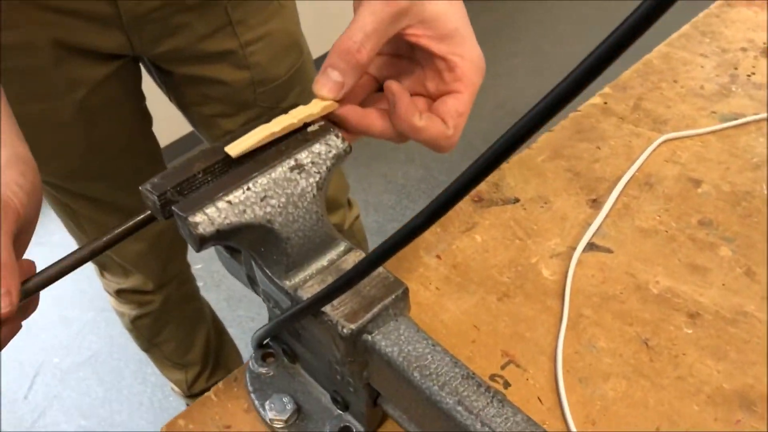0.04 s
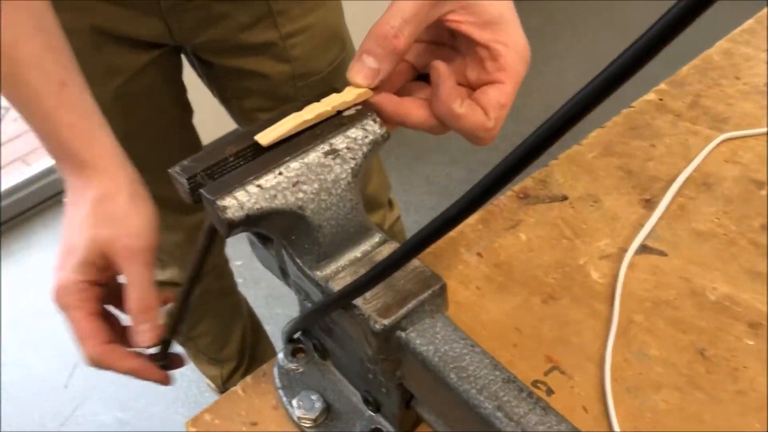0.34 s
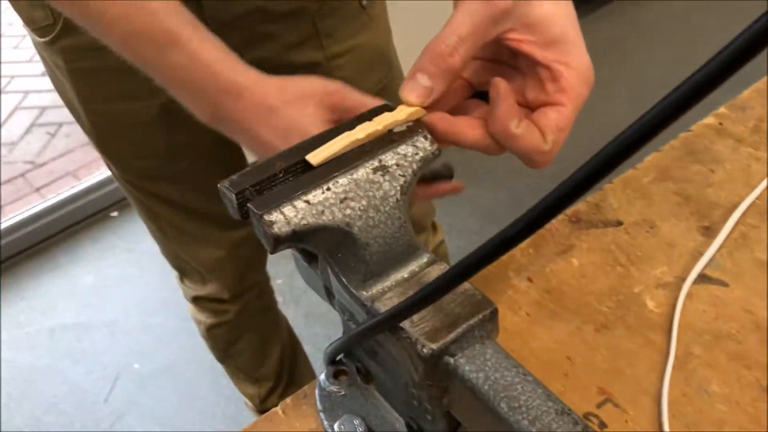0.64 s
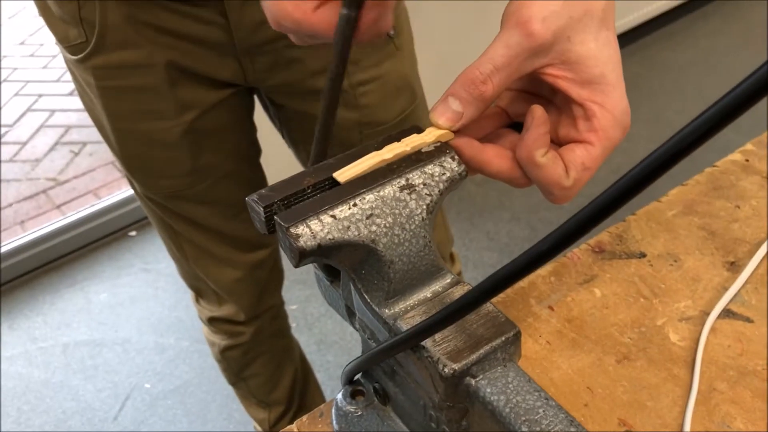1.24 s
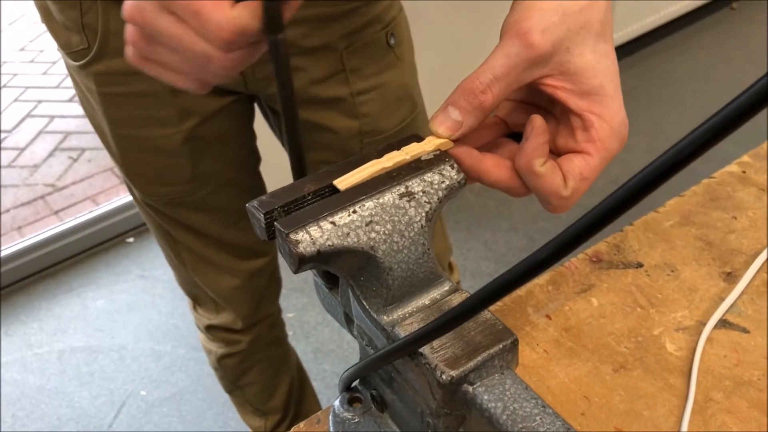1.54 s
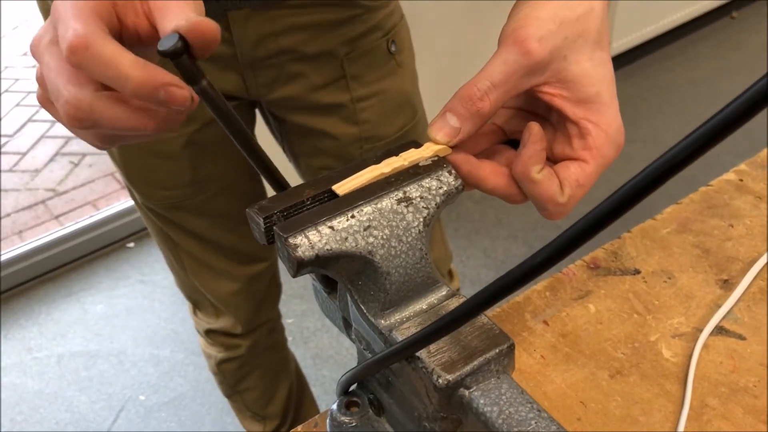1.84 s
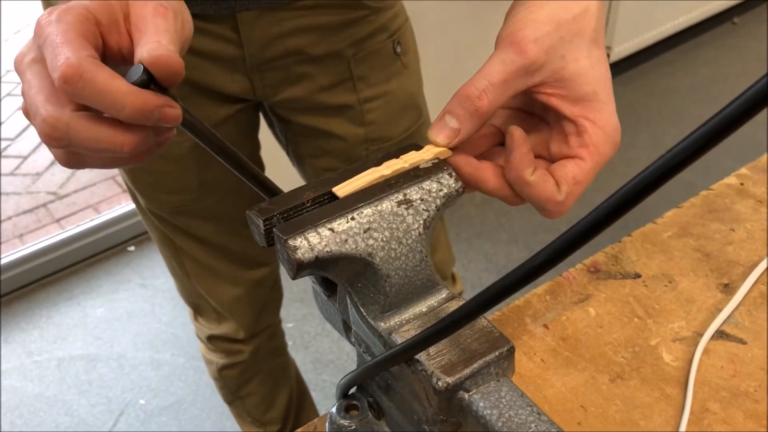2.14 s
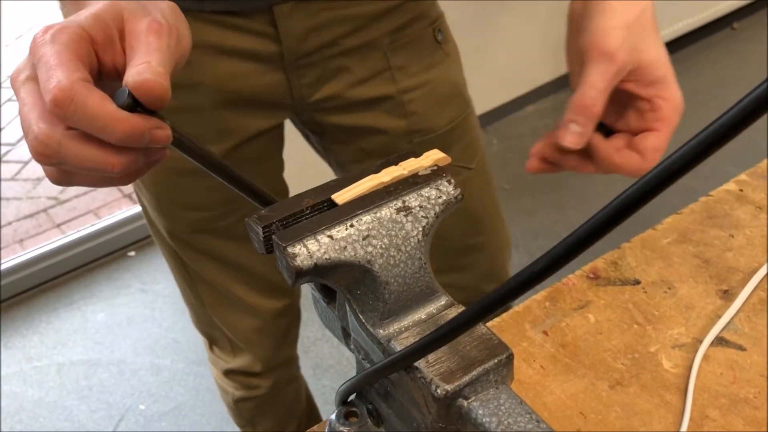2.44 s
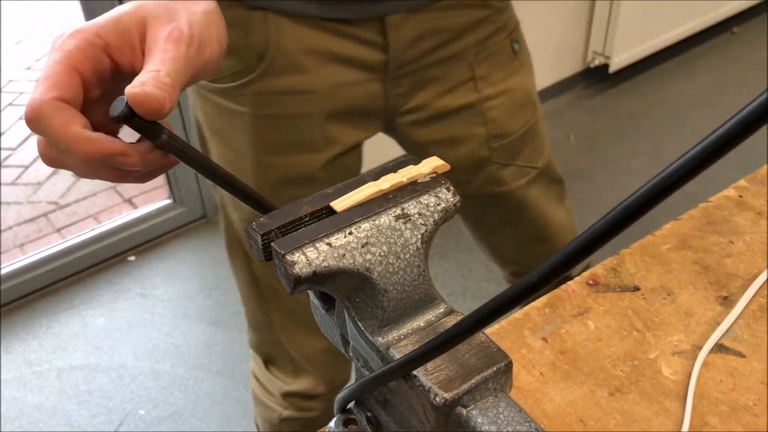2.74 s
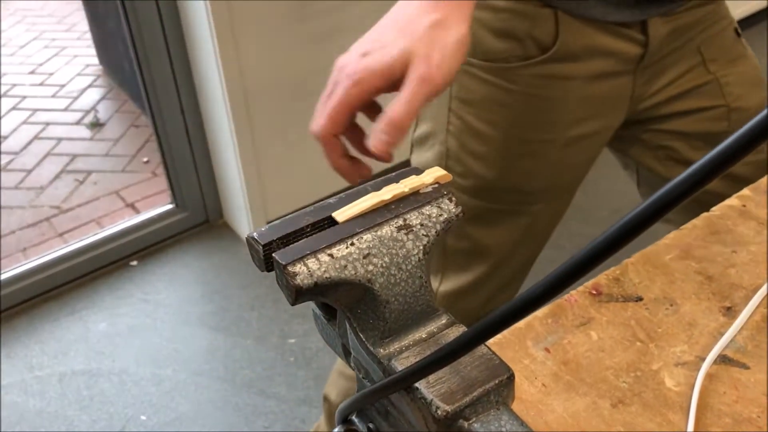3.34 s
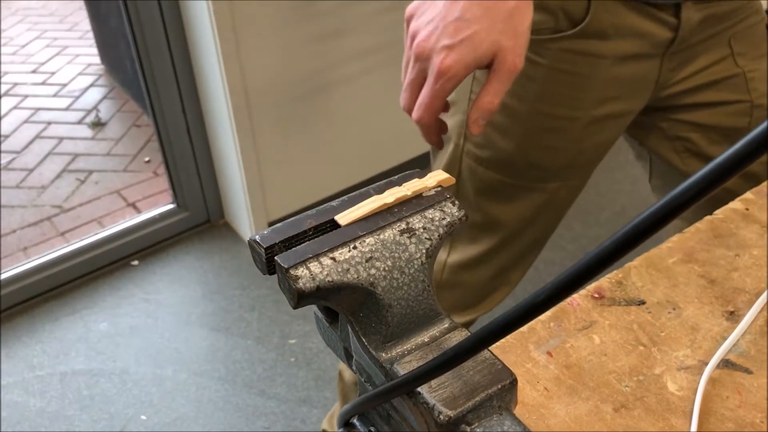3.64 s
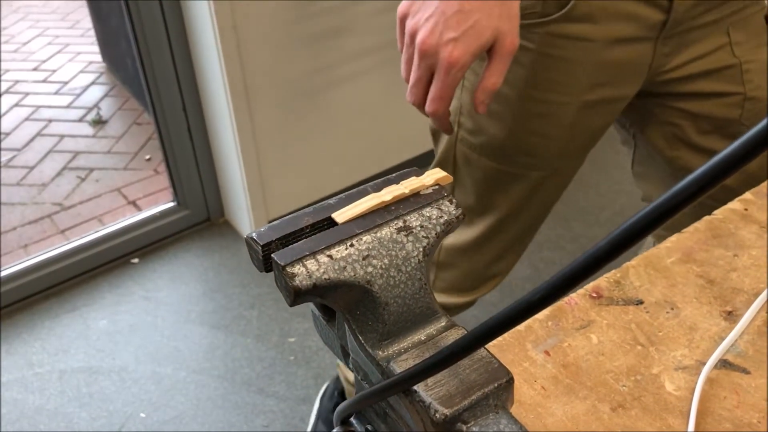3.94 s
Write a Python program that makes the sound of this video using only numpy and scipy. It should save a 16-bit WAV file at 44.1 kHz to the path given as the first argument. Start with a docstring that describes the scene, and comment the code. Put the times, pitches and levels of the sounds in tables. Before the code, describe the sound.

A steel vise handle slides rattling through its hole and stops with a sharp clank.

```python
"""The loose handle of a steel bench vise slides rattling through the screw head until its end knob
clanks against it. Each hit rings the rod and the vise, and the wooden bench thuds.
Before that the vise is tightened: a hand knocks the handle, shoes and sleeves scuff,
and there are faint gurgles and rubs. The workshop echoes over a low, steady hush."""
import sys
import numpy as np
from scipy import signal
from scipy.fft import rfft, irfft
from scipy.io import wavfile

SR = 44100
rng = np.random.default_rng(int(sys.argv[2]) if len(sys.argv) > 2 else 0)


def file_out(sig):
    """Save sig as 16-bit WAV at sys.argv[1]."""
    # one column per channel
    cols = np.atleast_2d(sig).T
    # limit, then scale
    lim = np.clip(cols, -1, 1)
    pcm = np.round(lim * 32767).astype(np.int16)
    wavfile.write(sys.argv[1], SR, pcm)


N = 176400
T, HZ = np.arange(N) / SR, np.fft.rfftfreq(N, 1 / SR)

# Levels in the tables are relative. A spectrum says how strong each pitch is.
# room noise: f/Hz, level/dB
HUSH_SPECTRUM = [(15, -43.5), (25, -16), (48, -3.5), (75, -5.5), (107, -1.5), (183, -5), (253, -13),
                 (289, -12), (368, -13), (399, -17.5), (648, -21.5), (722, -25.5), (848, -29.5), (970, -25),
                 (1110, -28), (1660, -28.5), (2170, -33), (3090, -31), (3340, -31.5), (3720, -29),
                 (5730, -40), (10400, -44), (15500, -52.5)]
# how long the echo takes to fade by 60 dB (its t60): f/Hz, t60/s
ECHO_FADES = [(100, 0.75), (500, 0.86), (1300, 0.95), (3300, 0.56), (4200, 0.76), (8000, 0.62),
              (13000, 0.36), (16000, 0.44)]
# strength of the echo: f/Hz, level/dB
ECHO_SPECTRUM = [(100, -10.5), (500, -8), (1300, -4), (3200, -10), (4200, -10.5), (8000, -14.5),
                 (13000, -15)]
# shoes and cloth: t/s, half length/s, level/dB, tilt/(dB per octave), rasp f/Hz, rasp boost/dB
SCUFFS = [(0.136, 0.02, -55.5, 5, 8000, 10), (0.204, 0.18, -59, -0.5, 9300, 5),
          (0.278, 0.023, -43, 2.5, 2420, 10.5), (.318, 0.029, -42.5, -.5, 2900, 7),
          (2.458, 0.058, -54.5, -1, 4240, 3)]
# brushing noise: f/Hz, level/dB
SCUFF_SPECTRUM = [(25, -28), (100, -11.5), (350, 3.5), (750, -1.5), (1500, -1), (2600, -4), (4200, -5),
                  (6000, -6), (10000, -14.5), (15500, -23)]
# faint gurgles, soft rubs and a tick: t/s, half length/s, level/dB, f/Hz, width/octaves
SMALL_SOUNDS = [(.909, 0.0023, -60.5, 4800, 0.13), (1.264, .04, -65, 840, 0.45),
                (1.69, 0.055, -67.5, 980, 0.35), (2.032, .007, -63.5, 1350, .3),
                (2.038, 0.0056, -61, 860, .4), (2.178, 0.0045, -60, 1460, 0.25),
                (2.192, 0.0068, -61.5, 800, 0.3), (2.33, 0.025, -62, 1110, .2),
                (2.354, 0.032, -54.5, 651, .14), (2.865, 0.034, -58.5, 620, 0.36),
                (2.84, 0.015, -63, 1150, .25)]
# thumps through bench and floor: t/s, level/dB, t60/s
THUMPS = [(0.0, -42, 0.53), (0.616, -49, 0.81), (.675, -40, 0.61), (.765, -48.5, 0.58),
          (1.109, -47.5, 0.59), (1.441, -47.5, .6), (2.881, -49, 1), (3.405, -25, 0.43), (3.85, -52, .6),
          (3.952, -47.5, 0.58)]
# a low thump: f/Hz, level/dB
THUMP_SPECTRUM = [(25, -45), (60, -19), (100, -6.5), (130, 3.5), (175, -7.5), (260, -16), (600, -24),
                  (1500, -51.5), (15000, -86.5)]
# knocks of the hand: t/s, level/dB, hardness/Hz (higher is brighter)
KNOCKS = [(0.6662, -38, 4500), (0.6713, -39, 1430), (0.677, -33.5, 870), (.699, -44, 1340),
          (1.279, -46, 610)]
# a dull knock: f/Hz, level/dB
KNOCK_SPECTRUM = [(25, -32), (50, -5), (130, 8), (300, 1), (520, 4.5), (1000, 0), (1500, -9), (2700, -12.5),
                  (3400, -18), (5500, -16), (15000, -31)]
# loudness of the sliding rod: t/s, level/dB
SLIDE_LEVELS = [(3.08, -81.5), (3.17, -53), (3.225, -51.5), (3.24, -42), (3.29, -41), (3.32, -41.5),
                (3.348, -42.5), (3.365, -29), (3.392, -38), (3.41, -69.5)]
# the rod scraping in its hole: f/Hz, level/dB
SCRAPE_SPECTRUM = [(25, -45), (60, -20), (170, -3), (550, -9), (790, 4), (860, -2), (970, 3), (1200, -10),
                   (1650, -2), (2100, -6), (2800, -17), (4600, -16), (5500, -22), (8000, -28), (11000, -41),
                   (15800, -46)]
# dense, short ring of the cast vise body: f/Hz, level/dB
CRACK_SPECTRUM = [(25, -41.5), (60, -23), (150, 1.5), (400, 0.5), (850, -3.5), (1200, -6), (2000, -6.5),
                  (2700, -9), (4500, -3), (6200, 1.5), (7000, -5.5), (8300, 3.5), (9300, -3), (10200, -11),
                  (11900, -8), (13500, 4.5), (14500, -4), (15300, -21)]
# modes (natural tones) of vise and bench: f/Hz
VISE_PITCHES = [129, 190, 318, 495, 545, 1325, 2050, 3341, 5566, 9146, 9249, 12668, 14321, 14382]
# the same modes: level/dB, t60/s
VISE_MODES = [(-16, .35), (-11.5, 0.17), (-17.5, .16), (-1, 0.12), (-17.5, .12), (-16, 0.13), (-23.5, 0.14),
              (-8, 0.22), (-23.5, 0.23), (-10, 0.092), (-12, 0.088), (0.5, .1), (-4.5, .22), (-8, 0.23)]
# bending modes of the rod: f/Hz
ROD_PITCHES = [778, 887, 986, 1618, 4034, 7835, 7911, 12560, 12763, 12925]
# the same modes: level/dB, t60/s
ROD_MODES = [(-9.5, 0.063), (-12.5, 0.16), (-20.5, 0.097), (-21.5, 0.067), (-9.5, 0.24), (1.5, 0.11),
             (-3.5, .2), (-11, 0.16), (1.5, .16), (-16.5, .12)]
# handle hits on the screw head: t/s, crack level/dB, rod level/dB, vise level/dB, hardness/Hz
HITS = [(3.2338, -30, -36, -63.5, 6000), (3.2570, -36, -26, -61.5, 5560),
        (3.2815, -24.5, -32.5, -48.5, 10200), (3.29, -27, -30, -54.5, 10200), (3.2970, -40, -22, -58, 1600),
        (3.351, -31.5, -44, -62, 7000), (3.361, -21, -33.5, -52.5, 8500), (3.3710, -35, -18.5, -56.5, 1310),
        (3.3836, -19.5, -39, -43.5, 7000), (3.3922, -3, -11, -25, 17250),
        (3.396, -15.5, -23.5, -25.5, 16000), (3.4040, -23, -12.5, -13.5, 19660),
        (3.4089, -11.5, -24, -16.5, 15000), (3.4233, -16, -32.5, -40, 11900)]

FLUTTER_DB, FLUTTER_HZ = 1.2, 44.87  # the loose rod makes the ring flutter
SEAT_S, SEAT_FALL_S = 3.419, 0.023  # when and how fast the knob settles
SEAT_LOSS_DB, SEAT_ABOVE_HZ = 12.5, 6000  # how it then damps the high modes
SWELL_CYCLES = 1.2  # a mode takes this long to swell
KNOCK_T60_S, CRACK_T60_S, SNAP_T60_S, CASTING_T60_S = 0.041, 0.046, 0.0042, 0.11
LOW_CUT_HZ, HIGH_CUT_HZ = 55, 15800


def amp(db):
    """Turn decibels into a gain."""
    return 10 ** (np.asarray(db) / 20)


def read(points, hz):
    """Look up a table between its points, on a log-frequency axis."""
    f, value = np.transpose(points)
    return np.interp(np.log(hz + 1), np.log(f + 1), value)


def noise(db):
    """Noise of power one with the given spectrum."""
    x = irfft(rfft(rng.standard_normal(N)) * amp(db), N)
    return x / x.std()


def band_noise(hz, octaves, steepness):
    """Noise gathered around one pitch."""
    distance = np.log2((HZ + 1) / hz) / octaves
    return noise(-steepness * np.log10(1 + distance ** 2))


def waver(rate_hz):
    """A smooth random wobble of about size one."""
    return noise(-np.minimum(20 * (HZ / rate_hz) ** 2, 200))


def decay(start, t60):
    """A loudness curve that jumps to one and dies away."""
    return (T >= start) * np.exp(-np.log(1000) * np.clip((T - start) / t60, 0, 3))


def swell(middle_s, half_s, db):
    """A loudness curve that rises and falls like a rubbing stroke."""
    return amp(db) * np.exp(-0.675 * ((T - middle_s) / half_s) ** 2)


def softened(hz, hard_hz):
    """A soft hit stirs up little above its hardness."""
    return 1 / np.sqrt(1 + (hz / hard_hz) ** 8)


def coloured(x, db):
    """Give white noise a spectrum, keeping its power; nothing sounds ahead of the input."""
    gain = amp(np.maximum(db, np.max(db) - 90))
    gain /= np.sqrt(np.mean(gain ** 2))
    cepstrum = irfft(np.log(gain), N)
    cepstrum[1:N // 2] *= 2  # fold the late half onto the early half
    cepstrum[N // 2 + 1:] = 0
    response = irfft(np.exp(rfft(cepstrum)), N)[:4096]
    return signal.oaconvolve(x, response)[:N]


def contact(envelope, spectrum, hard_hz):
    """A burst of noise as two things meet, duller for a soft hit."""
    db = read(spectrum, HZ) + 20 * np.log10(softened(HZ, hard_hz))
    return coloured(envelope * rng.standard_normal(N), db)


def hush():
    """Steady room noise whose bass gently wavers."""
    steady = amp(-53.5) * noise(read(HUSH_SPECTRUM, HZ))
    bass = signal.sosfilt(signal.butter(1, 300, fs=SR, output="sos"), steady)
    return steady + bass * (amp(-waver(rate_hz=7.94)) - 1)


def room_echo(x):
    """The room answers with a blurred tail, each band dying at its own speed."""
    hz, t, bands = signal.stft(rng.standard_normal(SR), SR, nperseg=256)
    fade_rate = np.log(1000) / read(ECHO_FADES, hz)[:, None]
    gain = amp(read(ECHO_SPECTRUM, hz)[:, None]) * np.sqrt(2 * fade_rate / SR)
    tail = signal.istft(bands * gain * np.exp(-fade_rate * t), SR, nperseg=256)[1][:SR]
    fade_in = np.clip(T[:SR] / 0.011 - 0.5, 0, 1)  # the echo comes a moment late
    return signal.fftconvolve(x, tail * fade_in)[:N]


def rumble():
    """A low handling rumble swells and fades."""
    return swell(middle_s=1.62, half_s=0.15, db=-54) * band_noise(hz=58.4, octaves=0.13, steepness=30)


def small_sounds():
    """Faint, short gurgles, soft rubs and a tick, each a swell of narrow noise."""
    return sum(swell(s, half, db) * band_noise(hz, width, steepness=20)
               for s, half, db, hz, width in SMALL_SOUNDS)


def scuffs():
    """Soles and cloth brush with a grainy sound, each stroke with its own rasp."""
    octaves = np.log2(np.maximum(HZ, 300) / 2000)
    out = np.zeros(N)
    for s, half, db, tilt, hz, rasp_db in SCUFFS:
        rasp = rasp_db * np.exp(-(np.log2((HZ + 1) / hz) / 0.67) ** 2)
        out += swell(s, half, db) * noise(read(SCUFF_SPECTRUM, HZ) + tilt * octaves + rasp)
    return out * amp(-1.5 + 1.1 * waver(rate_hz=300))


def screw_ring(width_hz=54):
    """Rubbing in the turning thread keeps two faint tones sounding."""
    peaks = sum(amp(db) / (1 + ((HZ - hz) / width_hz) ** 2) for hz, db in [(3100, -1.7), (4200, -0.3)])
    return swell(middle_s=1.04, half_s=0.73, db=-79) * noise(20 * np.log10(peaks))


def thumps(rise_s=0.007):
    """Low thuds travel through bench and floor."""
    power = sum((amp(db) * decay(s, t60) * np.clip((T - s) / rise_s, 0, 1)) ** 2 for s, db, t60 in THUMPS)
    return np.sqrt(power) * noise(read(THUMP_SPECTRUM, HZ))


def ring(pitches, modes, times, levels, hard_hz):
    """Each hit adds energy to every mode; the ring flutters, and the settled knob damps high modes."""
    out = np.zeros(N)
    seated = np.clip((T - SEAT_S) / SEAT_FALL_S, 0, 1)
    for hz, (db, t60) in zip(pitches, modes):
        kicks = np.bincount((times * SR).astype(int), (amp(levels) * softened(hz, hard_hz)) ** 2, N)
        kept = np.exp(-2 * np.log(1000) / (t60 * SR))  # share of energy left after one sample
        energy = signal.lfilter([1], [1, -kept], kicks)
        lag = np.exp(-hz / (SWELL_CYCLES * SR))
        size = signal.lfilter([1 - lag], [1, -lag], np.sqrt(energy))
        flutter_db = FLUTTER_DB * np.interp(T * FLUTTER_HZ, np.arange(400), rng.standard_normal(400))
        loss_db = SEAT_LOSS_DB * seated * (hz > SEAT_ABOVE_HZ)
        tone = np.sin(2 * np.pi * (hz * T + rng.random()))
        out += size * amp(db + flutter_db - loss_db) * tone
    return np.sqrt(2) * out


def hand_knocks():
    """A hand makes dull knocks that barely ring the vise."""
    times, levels, hard_hz = np.transpose(KNOCKS)
    knocks = sum(contact(amp(db) * decay(s, KNOCK_T60_S), KNOCK_SPECTRUM, hard) for s, db, hard in KNOCKS)
    return knocks + ring(VISE_PITCHES, VISE_MODES, times, levels - 16.5, hard_hz)


def casting(times, levels, hard_hz, count=170, rise_s=0.00033):
    """Every hit rings a cloud of weak, close modes in the cast body of the vise."""
    t, out = T[:SR // 4], np.zeros(N)
    place, phase, life = rng.random((count, 3)).T
    hz = np.interp((np.arange(count) + place) / count, [0, 0.3, 1], [250, 2400, 14800])
    size = amp(read(CRACK_SPECTRUM, hz) + 2.2 * np.clip(rng.standard_normal(count), -2, 2))
    t60 = CASTING_T60_S * (0.5 + life[:, None])
    modes = np.sin(2 * np.pi * (hz[:, None] * t + phase[:, None])) * np.exp(-np.log(1000) * t / t60)
    for s, db, hard in zip(times, levels, hard_hz):
        weights = size / np.linalg.norm(size) * softened(hz, hard) * rng.choice([-1, 1], count)
        out[int(s * SR):][:len(t)] += amp(db) * (weights @ modes) * np.minimum(t / rise_s, 1)
    return amp(-10.5) * out


def handle():
    """The rod scrapes, rattles and hits its stop, ringing itself and the vise."""
    times, crack_db, rod_db, vise_db, hard_hz = np.transpose(HITS)
    cracks = np.zeros(N)
    for s, db, hard in zip(times, crack_db, hard_hz):
        envelope = np.hypot(decay(s, CRACK_T60_S), amp(-0.5) * decay(s, SNAP_T60_S))
        cracks += contact(amp(db - 7.5) * envelope, CRACK_SPECTRUM, hard)
    slide_db = np.interp(T, *np.transpose(SLIDE_LEVELS), left=-120, right=-120)
    scrape = amp(slide_db + 2.8 * waver(rate_hz=150)) * noise(read(SCRAPE_SPECTRUM, HZ))
    rod = ring(ROD_PITCHES, ROD_MODES, times, rod_db, hard_hz)
    vise = ring(VISE_PITCHES, VISE_MODES, times, vise_db, hard_hz)
    return cracks + scrape + amp(-4.5) * (rod + vise) + casting(times, crack_db, hard_hz)


def scene():
    """The vise is close by; the scuffs are further off, so they echo more."""
    near = handle() + hand_knocks() + thumps() + small_sounds() + screw_ring()
    far = scuffs()
    return (near + far + room_echo(near + amp(2) * far) + rumble() + hush())[None]


def record(dry):
    """The microphone drops deep bass, rounds off the loudest peaks and cuts the highest treble."""
    thin = signal.sosfilt(signal.butter(2, LOW_CUT_HZ, "high", fs=SR, output="sos"), dry)
    rounded = thin / (1 + thin ** 6) ** (1 / 6)
    treble_cut = signal.firwin(511, HIGH_CUT_HZ, window=("kaiser", 9), fs=SR)
    return signal.oaconvolve(rounded, treble_cut[None], "same")


dry = scene()
out = record(dry)
file_out(out)
```